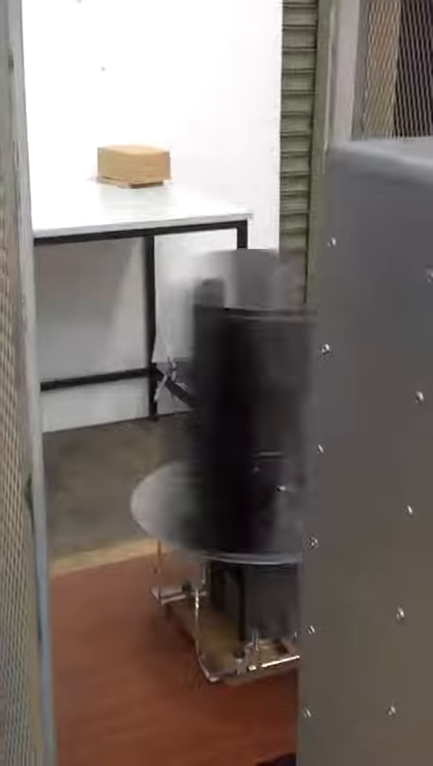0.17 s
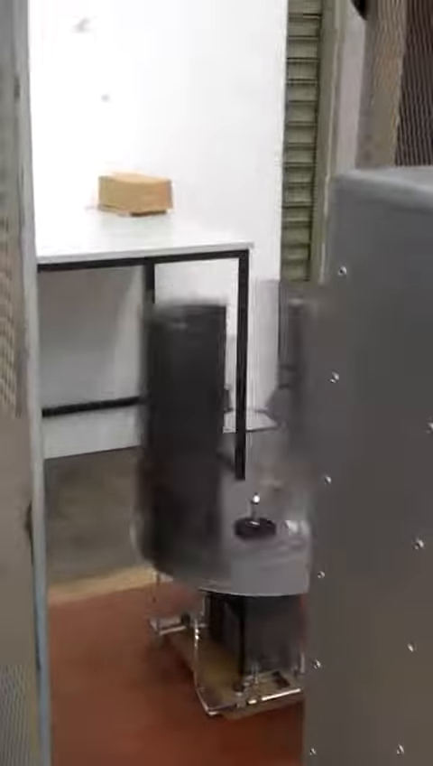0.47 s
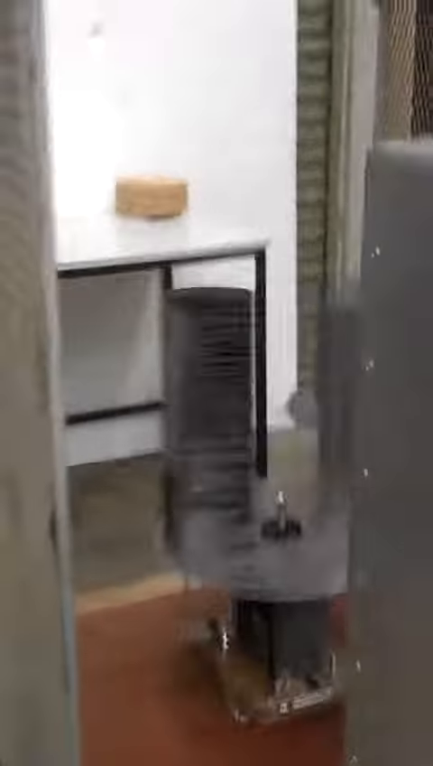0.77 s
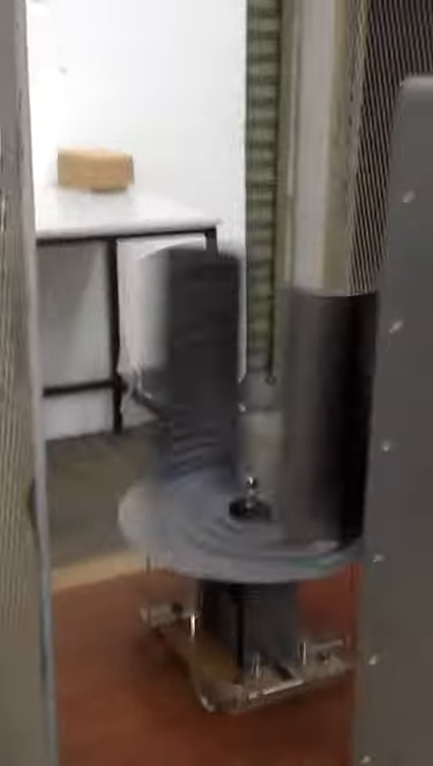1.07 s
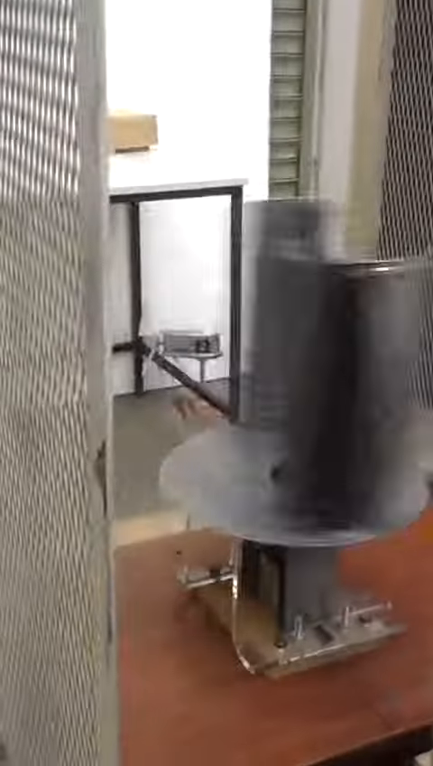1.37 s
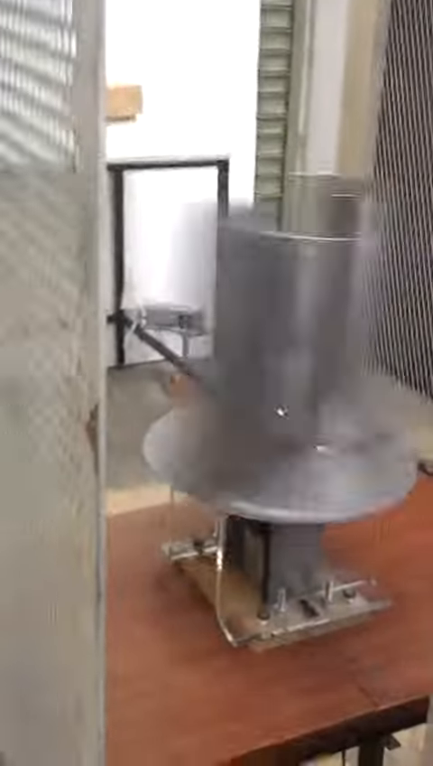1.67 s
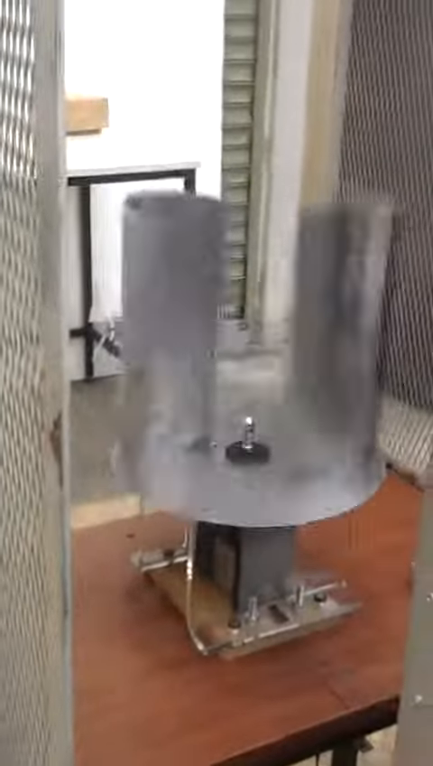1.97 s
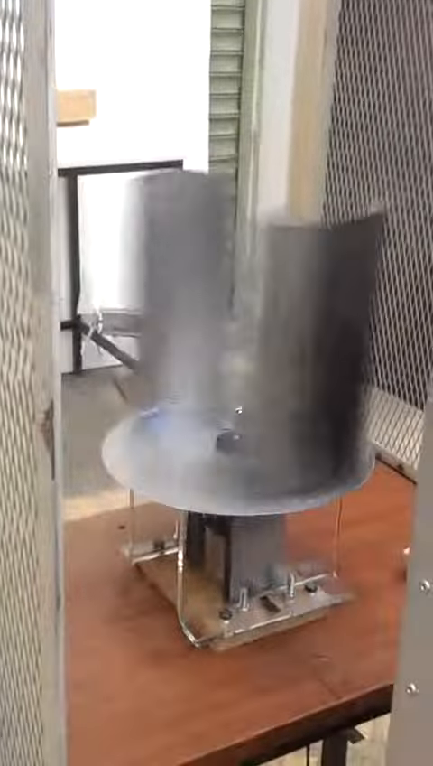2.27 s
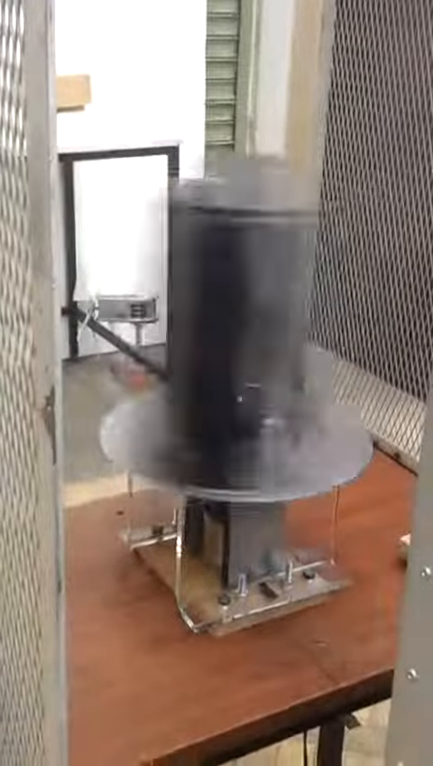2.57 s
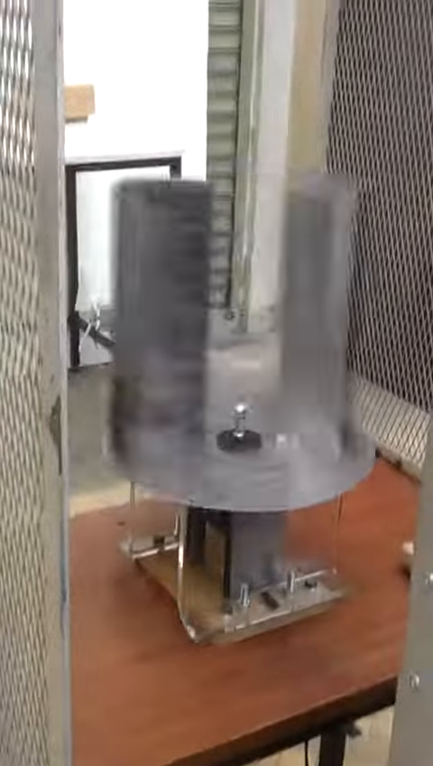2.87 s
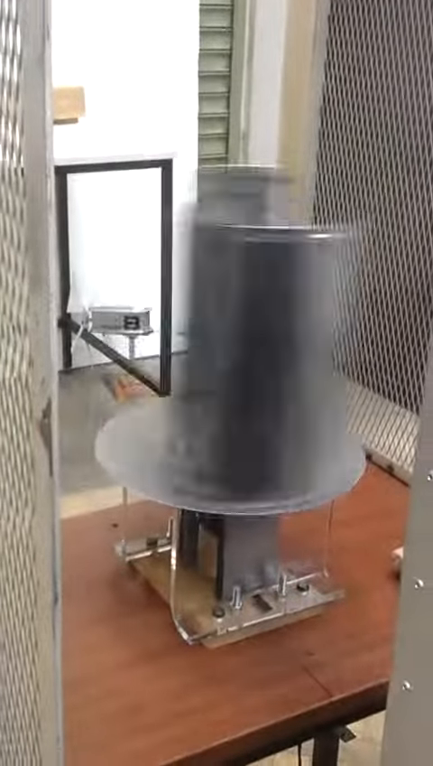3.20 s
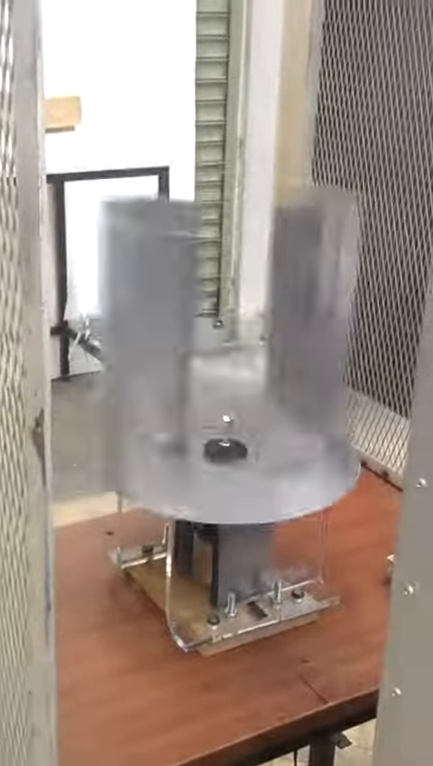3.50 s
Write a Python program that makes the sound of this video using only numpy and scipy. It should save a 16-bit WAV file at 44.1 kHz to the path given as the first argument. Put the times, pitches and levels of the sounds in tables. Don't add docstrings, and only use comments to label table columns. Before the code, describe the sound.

Strong steady fan airflow roars and hisses around a spinning drum turbine, with faint high motor whine.

```python
import sys
import numpy as np
from scipy import signal
from scipy.fft import rfft, irfft
from scipy.io import wavfile
from scipy.ndimage import uniform_filter1d

SR = 44100
rng = np.random.default_rng(int(sys.argv[2]) if len(sys.argv) > 2 else 0)


def elevation(decibels):
    levels = np.asarray(decibels, float)
    return 10 ** (levels / 20)


def to_wav(s):
    ch = np.atleast_2d(s).T
    pcm = np.round(np.clip(ch, -1, 1) * 32767)
    wavfile.write(sys.argv[1], SR, pcm.astype(np.int16))


N = 160524
START_S, START_RISE_S = .0722, .0008
MOTOR_HZ = 32


def level(x, db):
    return x * elevation(db) / np.sqrt(np.mean(x ** 2))


def line(table, t, col=1):
    return np.interp(t, [r[0] for r in table], [r[col] for r in table])


def over_hz(table, col=1):
    hz = np.fft.rfftfreq(N, 1 / SR) + 1
    return np.interp(np.log(hz), [np.log(r[0]) for r in table], [r[col] for r in table])


def walk(rate):
    hold = int(SR / rate)
    steps = np.repeat(rng.standard_normal(N // hold + 1), hold)
    return 1.5 * uniform_filter1d(uniform_filter1d(steps, hold), hold)[:N]


def swell(t, start_s, peak_s):
    u = np.maximum(t - start_s, 0) / peak_s
    return u * np.exp(1 - u)


def start_gate(t):
    return np.clip((t - START_S) / START_RISE_S, 0, 1)


def narrow(f_hz, width_hz, db):
    hz = np.fft.rfftfreq(N, 1 / SR)
    spec = rfft(rng.standard_normal(N)) / (1 + (2 * (hz - f_hz) / width_hz) ** 2)
    return level(irfft(spec, N), db)


def air(table, shared_db, own_db, count, lift_db=0):
    log_hz = np.log(np.fft.rfftfreq(N, 1 / SR) + 1)
    spec = rfft(rng.standard_normal(N)) * elevation(over_hz(table))
    centres = np.log(np.geomspace(table[0][0], table[-1][0], count))
    step, out = centres[1] - centres[0], 0
    for k, centre in enumerate(centres):
        window = np.cos(np.clip((log_hz - centre) / step, -1, 1) * np.pi / 2) ** 2
        band_db = shared_db + own_db * walk(rate=14) + lift_db * k / (count - 1)
        out = out + irfft(spec * window, N) * elevation(band_db)
    return out


def tone(hz, db, t):
    wobble_db = 1.2 * walk(rate=9.04)
    phase = 2 * np.pi * (hz * t + rng.random()) + .35 * walk(rate=4)
    return np.sqrt(2) * elevation(db + wobble_db) * np.sin(phase)


# (frequency [Hz], density [dB per Hz])
ROAR_COLOUR = [(18, -84), (30, -65), (113, -21), (178, -0.5), (233, -8), (296, -1), (550, -4), (766, -2),
               (1100, -9), (1430, -36.5), (2420, -120)]


def roar(flutter):
    return level(air(ROAR_COLOUR, 0.39 * flutter, 0.53, count=12), -22.34)


# (frequency [Hz], width [Hz], level [dB])
DUCT_MODES = [(182.7, 34, -40), (299.2, 5.1, -40), (384.8, 23, -38), (490, 42, -33.5), (597, 18, -46.5),
              (755.4, 21, -34.5), (799, 14, -39.5), (1239, 25, -43), (2450, 180, -47), (3170, 20, -52)]
# (time [s], lift of lowest note [dB], lift of next notes [dB])
DUCT_CLUMPS = [(.12, 13.5, -4), (.28, 10, -5), (.49, 7, -7), (.7, -3, 4), (1.3, 11, 5), (1.5, 5, 8),
               (1.73, -2, 15), (2.17, 14, 6), (2.55, 6, -1), (2.97, 10, 0), (3.14, 7, 3), (3.38, 5.5, 4),
               (3.58, 7, 0)]


def duct(t):
    clump_s, lowest_top_hz, next_top_hz = .03, 230, 450
    throb_db, throb_top_hz = 2, 500
    lowest_db, next_db = 0, 0
    for s, lowest_lift_db, next_lift_db in DUCT_CLUMPS:
        clump = np.exp(-((t - s) / clump_s) ** 2 / 2)
        lowest_db = lowest_db + lowest_lift_db * clump
        next_db = next_db + next_lift_db * clump
    out = 0
    for f_hz, width_hz, db in DUCT_MODES:
        clump_db = lowest_db if f_hz < lowest_top_hz else next_db * (f_hz < next_top_hz)
        throb = throb_db * min(throb_top_hz / f_hz, 1) * walk(rate=8.07)
        out = out + narrow(f_hz, width_hz, db) * elevation(clump_db + throb)
    return out


# (frequency [Hz], density [dB per Hz])
HISS_COLOUR = [(590, -4.5), (1000, -6.5), (1380, -4), (2450, -5.5), (2890, -7.5), (3410, -7), (4620, -15),
               (5200, -27.5), (6760, -38), (11400, -120)]


def hiss(flutter, lift_db):
    return level(air(HISS_COLOUR, 1.01 * flutter, 0.47, count=8, lift_db=lift_db), -25.9)


# (time [s], lift of upper hiss [dB])
MESH_OPENING = [
    (.1, -3.5),
    (.6, -2),
    (1.2, 0),
    (1.8, 2.5),
    (2.3, 1),
    (2.9, -1),
    (3.3, 0.6),
    (3.6, -2),
]


def mesh_opening(t):
    return line(MESH_OPENING, t)


def mesh_edge(t):
    edge_s, length_s = 0.68, 0.13
    return narrow(2300, 600, -32.5) * np.exp(-((t - edge_s) / length_s) ** 2)


# (lower partner [dB], centre [dB], upper partner [dB])
DRIVE_TONES = [(-44, -55, -44), (-43, -52, -42), (-52, -56, -53), (-70, -68, -66)]


def whine(t):
    first_hz, spacing_hz = 2500, 1000
    out = tone(11470, -78, t)
    for i, dbs in enumerate(DRIVE_TONES):
        for k, db in zip((-1, 0, 1), dbs):
            out = out + tone(first_hz + i * spacing_hz + k * MOTOR_HZ, db, t)
    return out


# (frequency [Hz], density [dB per Hz])
BUZZ_COLOUR = [(2940, -41), (5000, -8.5), (6870, -11), (7650, -9), (7740, -1.5), (8270, -3), (8930, -11.5),
               (11900, -23.5), (12600, -60), (16400, -77), (22000, -120)]
# (time [s], level [dB])
CABINET_LEVEL = [
    (.09, -37),
    (.4, -38),
    (.8, -40),
    (1.2, -44.5),
    (1.6, -46.5),
    (2.3, -44.5),
    (3, -45.5),
    (3.63, -45),
]


def cabinet(t, flutter):
    carrier_hz, mains_hz = 8000, 100
    out = level(air(BUZZ_COLOUR, flutter, 0.99, count=6), -0.55)
    out = out + tone(carrier_hz, -6, t)
    out = out + tone(carrier_hz - MOTOR_HZ, -17, t) + tone(carrier_hz + MOTOR_HZ, -11, t)
    for k in (-5, -4, -3, -2, -1, 1, 2, 3, 4, 5):
        out = out + tone(carrier_hz + k * mains_hz, -20 - 1.5 * abs(k), t)
    return out * elevation(line(CABINET_LEVEL, t))


# (time [s], gain change [dB])
GUST_GAINS = [(.54, -1.2), (.79, -1), (1.01, -0.8), (1.25, -1.8), (1.56, -0.6), (2.05, 0.4), (2.18, 0),
              (2.451, -2.5), (2.701, -2), (2.94, -2), (3.09, -2), (3.31, -2), (3.59, -0.5),
              (1.38, 0),
    (2.63, 0.7),
    (2.89, 2),
    (3.36, 1.5),
    (3.49, 1),
]


def gust_gain_db(t):
    gust_s, depth = .018, 1.3
    return sum(depth * db * np.exp(-((t - s) / gust_s) ** 2 / 2) for s, db in GUST_GAINS)


# (time [s], level [dB], ring [Hz], time to peak [s])
TICK_RINGS = [
    (.0729, -9, 520, .0004),
    (.0743, -11.5, 2080, .0008),
    (.0744, -12.5, 2750, .0006),
    (.0742, -11.5, 4000, .0009),
    (.0743, -19, 3300, .0004),
    (.5828, -9, 840, .0016),
    (.7737, -9.5, 2050, .0009),
    (.7737, -16, 2700, .0007),
]


def ticks(t):
    out = narrow(5800, 2500, -25) * swell(t, .0742, .001)
    for s, db, hz, peak_s in TICK_RINGS:
        out = out + elevation(db) * swell(t, s, peak_s) * np.sin(2 * np.pi * hz * (t - s))
    return out


def scene():
    t = np.arange(N) / SR
    flutter = 0.32 * walk(rate=8.58) + 0.39 * walk(rate=17)
    lift_db = mesh_opening(t)
    stream = roar(flutter) + duct(t) + mesh_edge(t) + hiss(flutter, lift_db)
    drive = whine(t) * elevation(lift_db) + cabinet(t, flutter)
    mono = (stream + drive) * elevation(gust_gain_db(t) + 0.26) * start_gate(t) + ticks(t)
    return np.array([mono, mono])


# (frequency [Hz], gain [dB], lead [rad], unrelated share [dB])
LATE_COLOUR = [(60, -7, .3, -7), (130, 1.5, .07, -17), (260, -0.2, .16, -35), (560, -0.7, 0.46, -28),
               (1200, -3, .2, -7), (3500, -2, 0.22, -18), (6000, -2.5, .35, -8), (10000, -3, .6, -7)]


def late_copy(mid):
    lag_samples = 72
    spec = rfft(mid)
    scrambled = np.exp(2j * np.pi * rng.random(len(spec))) * uniform_filter1d(np.abs(spec), size=9)
    late = irfft(spec * elevation(over_hz(LATE_COLOUR)) * np.exp(1j * over_hz(LATE_COLOUR, col=2)), N)
    unrelated = irfft(scrambled * elevation(over_hz(LATE_COLOUR, col=3)), N)
    return -np.roll(late, lag_samples) + unrelated


# (time [s], length [s], lowest open frequency [Hz])
CEILING_SINKS = [(0.281, 0.061, 9450), (0.723, .12, 10000), (1.052, .09, 9600), (1.327, 0.066, 8500),
                 (1.44, .05, 10600), (1.535, 0.081, 9500), (1.66, .03, 10200), (1.777, 0.073, 10000),
                 (1.966, 0.063, 9550), (2.027, .07, 10700), (2.18, 0.051, 10200), (2.32, .03, 10000),
                 (2.428, .04, 9200), (2.578, 0.054, 9850), (2.707, 0.047, 10000), (2.912, 0.056, 9100),
                 (3.04, 0.049, 10600), (3.187, 0.03, 10100), (3.402, .04, 10500), (3.513, 0.079, 10200)]
# (frequency [Hz], share [0-1])
MUTED_SHARE = [(4300, 0), (5200, .04), (6800, .06), (7050, .2), (7400, .02), (8400, .03), (8750, .3),
               (12000, .25)]
# (frequency [Hz], share of neighbours' rms [ratio])
WEAK_SHARE = [(300, .03), (2600, .1), (4000, .16), (5200, .45), (6300, .6), (7600, .5), (9000, .7),
              (10300, 1.0), (12000, 1.3)]


def thin_treble(pair):
    hop, open_hz, wander_hz, sink_hz = 1024, 12000, 450, 300
    rise = np.cumsum(np.kaiser(hop + 1, 4 * np.pi))
    rise = np.sqrt(rise[:hop] / rise[-1])
    window = np.r_[rise, rise[::-1]][:, None]
    n, k = np.arange(2 * hop), np.arange(hop)
    cosines = np.cos(np.pi / hop * np.outer(n + .5 + hop / 2, k + .5))
    basis = window * cosines * np.sqrt(2 / hop)
    count = N // hop + 2
    padded = np.pad(pair, ((0, 0), (hop, (count + 1) * hop - N - hop)))
    blocks = padded.reshape(2, count + 1, hop)
    cells = np.concatenate([blocks[:, :-1], blocks[:, 1:]], axis=2) @ basis
    hz, t = (k + .5) * SR / 2 / hop, np.arange(count) * hop / SR

    ceiling_hz = open_hz + wander_hz * np.repeat(rng.standard_normal(count), 2)[:count]
    for s, length_s, low_hz in CEILING_SINKS:
        sunk_hz = low_hz - sink_hz + (open_hz - low_hz) * (1.4 * (t - s) / length_s) ** 4
        ceiling_hz = np.minimum(ceiling_hz, sunk_hz)

    dice = np.repeat(rng.random((count, hop // 8)), 8, axis=1)
    dice = np.repeat(dice, 2, axis=0)[:count]
    power = cells ** 2
    strong = power > line(WEAK_SHARE, hz) ** 2 * uniform_filter1d(power, size=24, axis=2)
    below = hz < ceiling_hz[:, None]
    onset = (t < START_S + .03)[:, None]
    keep = below & (dice >= line(MUTED_SHARE, hz)) & strong | onset
    frames = (cells * keep) @ basis.T
    return (frames[:, :-1, hop:] + frames[:, 1:, :hop]).reshape(2, -1)[:, :N]


def top_cut(x):
    return signal.sosfilt(signal.butter(12, 13360, fs=SR, output="sos"), x)


def record(dry):
    rumble_cut = signal.butter(2, 60, "high", fs=SR, output="sos")
    mid = signal.sosfilt(rumble_cut, dry.mean(0))
    side = late_copy(mid)
    mid, side = thin_treble(np.array([mid, side])) * start_gate(np.arange(N) / SR)
    return top_cut(np.array([mid + side, mid - side]))


dry = scene()
out = record(dry)
to_wav(out)
```